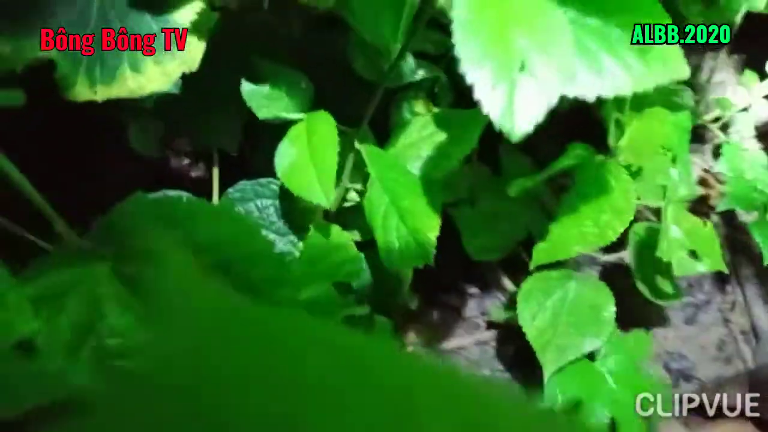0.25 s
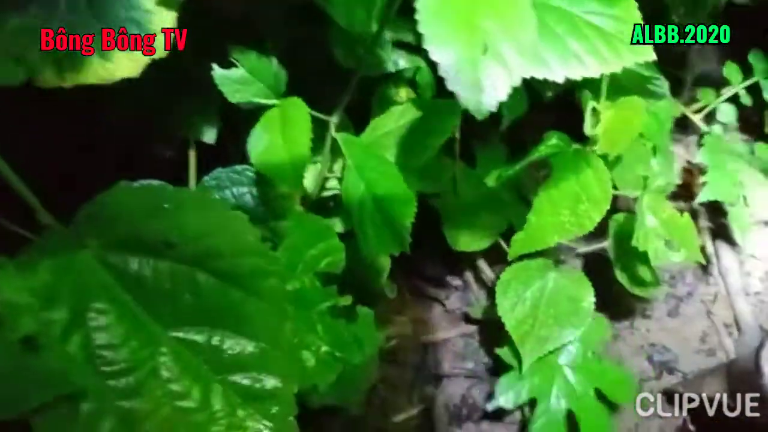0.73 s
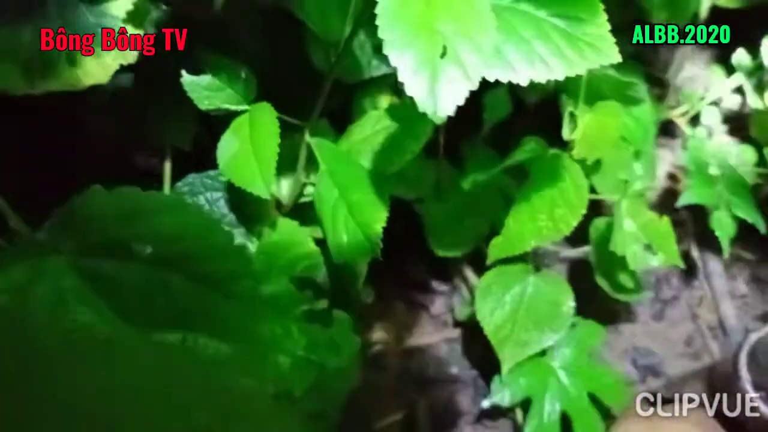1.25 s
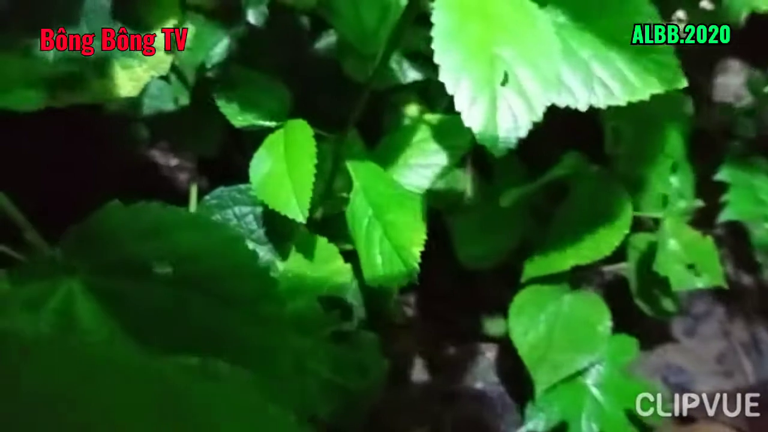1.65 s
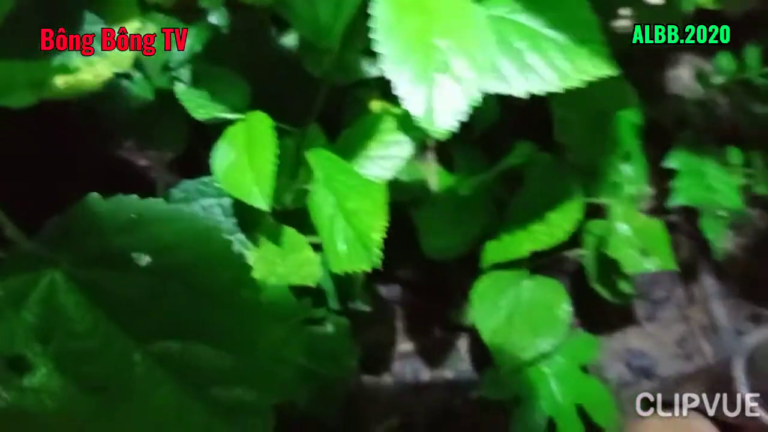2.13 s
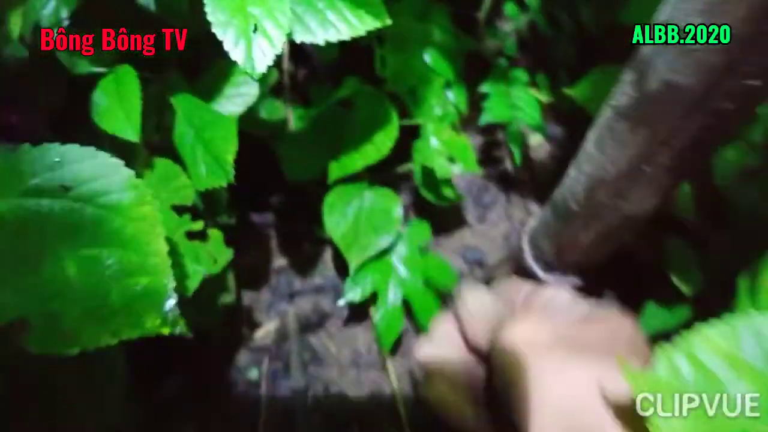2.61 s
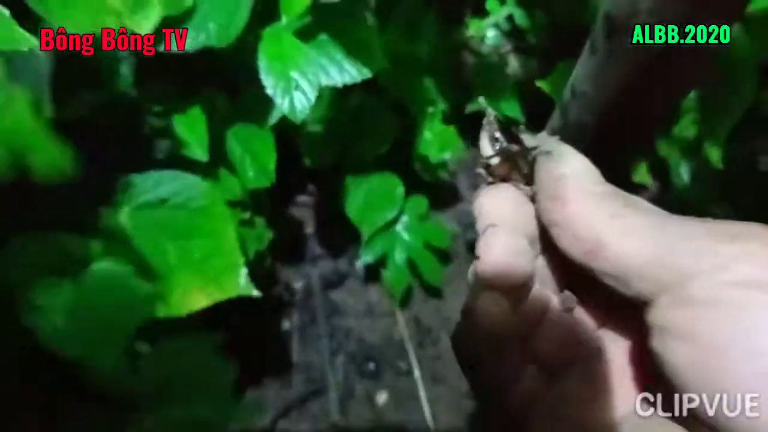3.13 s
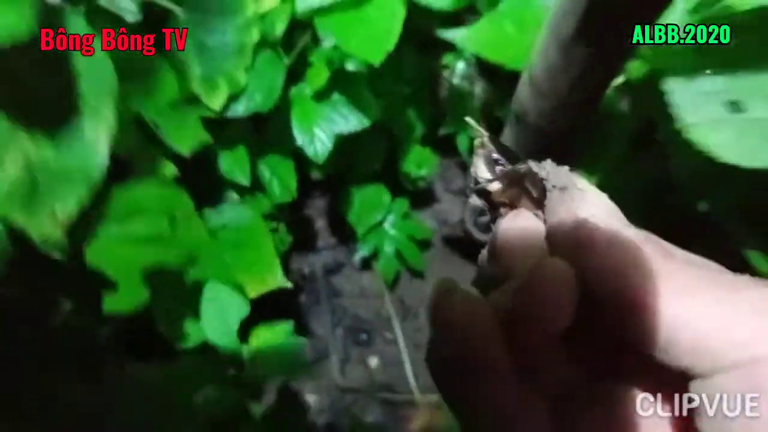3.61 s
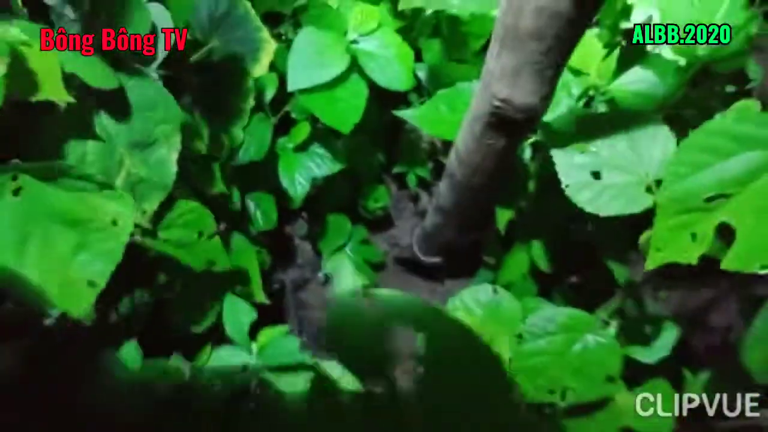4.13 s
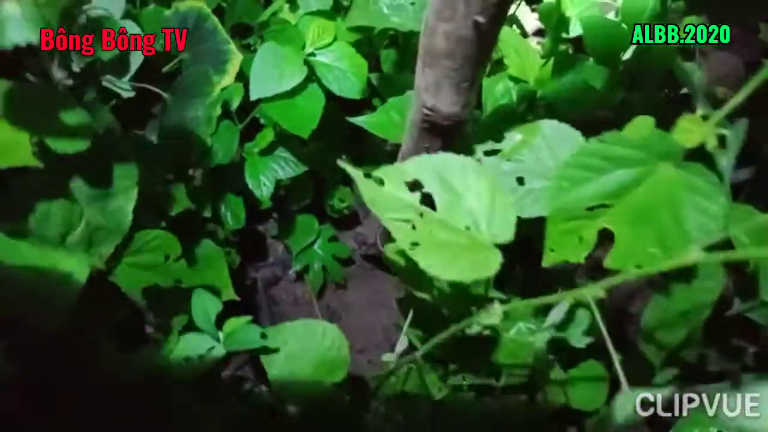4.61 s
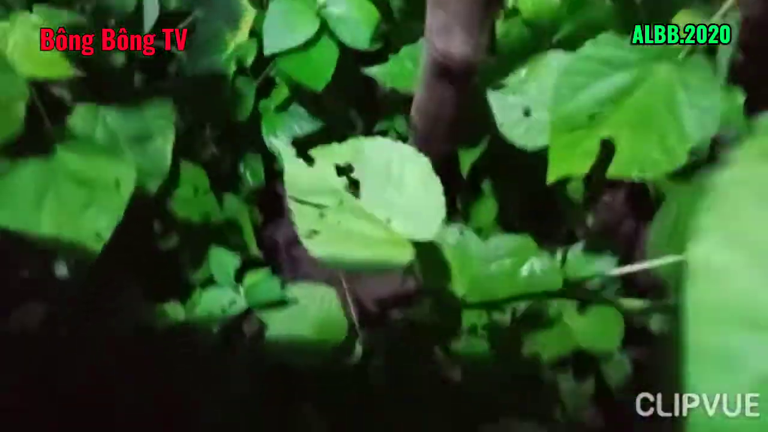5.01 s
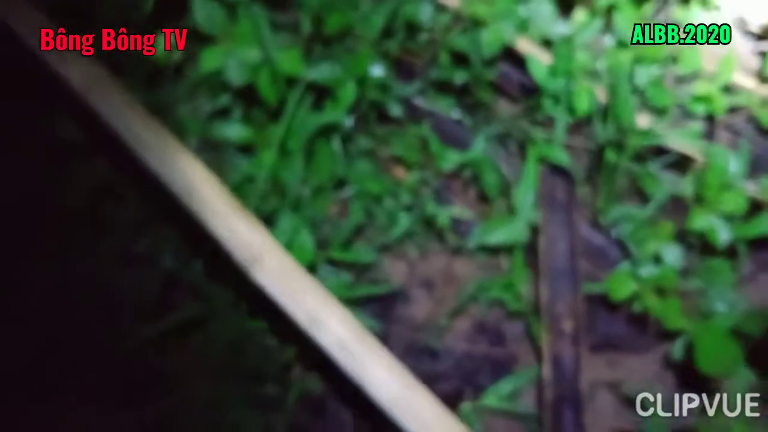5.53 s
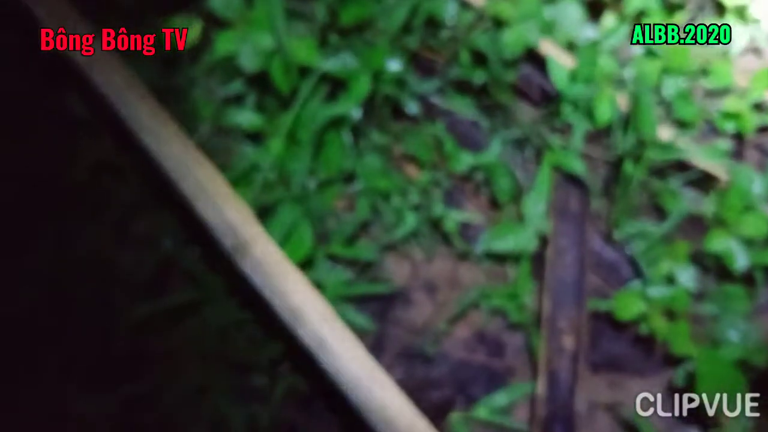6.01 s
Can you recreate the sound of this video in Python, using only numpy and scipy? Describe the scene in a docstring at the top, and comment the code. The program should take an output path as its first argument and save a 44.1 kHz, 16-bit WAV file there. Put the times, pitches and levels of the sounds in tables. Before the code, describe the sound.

A handheld microphone sits low among leaves while insects ring continuously: near crickets, a distant crowd, low chirping and very high buzzing. Light rustles and soft bumps come first, then a strong cluster of crackles, ticks and knocks in the middle. A faint motor-like drone joins late. The sound dips to silence and comes back at another spot, dominated by one piercing close cricket.

```python
"""Crickets in a night garden

Crickets trill without pause, two close by and a whole chorus behind, with other insects chirping and buzzing.
Each close cricket is a stack of tones spaced by its wing-stroke rate; far ones are strokes smeared by leaves.
A hand rustles in the leaves (clumps of snaps and noise) and bumps the microphone (short thuds and ticks).
A faint drone and hum, built from sine tones, join over low night air made of filtered noise.
The sound fades out and comes back at a second spot, right beside one loud cricket."""
import sys
import numpy as np
from scipy import signal
from scipy.fft import rfft, irfft, next_fast_len
from scipy.io import wavfile

SR = 44100
rng = np.random.default_rng(int(sys.argv[2]) if len(sys.argv) > 2 else 0)


def log_audio(samples):
    """Write samples as a 16-bit WAV file to the path given in sys.argv[1]."""
    # one column per channel
    frames = np.atleast_2d(samples).T
    # limit to full scale, then quantise
    limited = np.clip(frames, -1, 1)
    pcm = np.round(limited * 32767).astype(np.int16)
    wavfile.write(sys.argv[1], SR, pcm)


N = 276066
T = np.arange(N) / SR   # time of every sample [s]

# Tones of the nearest cricket: (multiple of stroke rate, level before the step [dB], level after it [dB])
NEAR_TONES = [(49, -62, -62), (50, -59, -56), (51, -49, -58), (52, -52, -56), (53, -56, -50),
              (54, -47, -47), (55, -43, -48), (56, -54, -44), (57, -53, -49), (58, -59, -55),
              (59, -70, -62), (60, -69, -59)]
# Its changing level, screened while the hand reaches in, then clear: (time [s], level [dB])
NEAR_LEVEL_CURVE = [(0, 1), (0.45, -0.5), (1.25, -1.5), (1.45, 1), (2.4, -0.5), (2.65, -3.5), (2.95, -2),
                    (3.55, 2.5), (3.9, 0.5), (4.8, -0.5)]
# Tones of the neighbour before its level curve: (multiple of stroke rate, level [dB])
NEIGHBOUR_TONES = [(53, -55), (54, -52), (55, -51), (56, -46), (57, -51), (58, -57), (59, -59), (60, -61),
                   (61, -65)]
# The neighbour strikes up loudly, settles, and comes close with the step: (time [s], level [dB])
NEIGHBOUR_LEVEL_CURVE = [(1.3, -27), (1.36, 2), (1.55, -5), (1.9, -2), (2.95, -1), (3.06, 4.5), (3.6, -3.5),
                         (4.8, 4)]
# Tones of the loud cricket at the second spot, before its gain: (multiple of stroke rate, level [dB])
LOUD_TONES = [(50, -52), (51, -75), (52, -44), (53, -38), (54, -38), (55, -34), (56, -35), (57, -42),
              (58, -50), (59, -54), (60, -56), (61, -59), (62, -65)]
# Tones of its higher rival, before its gain: (multiple of stroke rate, level [dB])
RIVAL_TONES = [(58, -51), (59, -46), (60, -48), (61, -64), (62, -64)]
# Tones of the rasping singer there, before its level curve: (multiple of stroke rate, level [dB])
RASPER_TONES = [(46, -67), (47, -62), (48, -61), (49, -56), (50, -63), (51, -69), (52, -68), (53, -70),
                (54, -70)]
# The rasping singer grows louder: (time [s], level [dB])
RASPER_LEVEL_CURVE = [(5.5, -3.5), (5.92, -4.5), (6.1, 1), (6.22, 4)]
# Tone colour of the crickets that join in there: (frequency [Hz], relative level [dB])
JOINING_COLOUR = [(2500, -75), (3500, -39), (3850, -6), (4030, 0.5), (4190, 8.5), (4300, 5.5), (4450, -2),
                  (4800, -43), (6000, -70)]
# Tone colour of all far insects there: (frequency [Hz], relative level [dB])
SECOND_CHORUS_COLOUR = [(1500, -69.5), (2600, -53), (2900, -35.5), (3400, -31), (3800, -10.5), (4050, -5.5),
                        (4230, -3), (4450, -4.5), (4900, -26), (5600, -24), (6400, -30.5), (7300, -31.5),
                        (8500, -23), (9700, -44), (15000, -49)]
# Chirps of the low triller: (start [s], length [s], level [dB])
LOW_CHIRP_TIMES = [(0.04, 0.2, -58), (0.29, 0.19, -54), (0.735, 0.23, -54.5), (1.097, 0.35, -57.5),
                   (1.44, 0.25, -59), (1.784, 0.33, -53), (2.123, .28, -51.5), (2.484, 0.18, -52),
                   (2.752, 0.2, -51.5), (3.742, 0.19, -53.5), (4.005, 0.34, -52), (4.605, 0.61, -55)]
# Phrases of the shrill triller: (start [s], level [dB])
SHRILL_PHRASE_TIMES = [(0.58, -50.5), (2.479, -50.5), (4.47, -55)]
# Bouts of the bush-cricket's buzz: (start [s], length [s], level [dB])
BUZZ_TIMES = [(-0.6, .91, -53), (1.336, 1.9, -53), (4.678, 1.0, -56)]
# A hand brushes leaves and soil: (start [s], length [s], level [dB])
BRUSH_STROKES = [(0.098, 0.039, -54.5), (0.167, 1, -61.5), (0.453, 0.038, -55), (0.757, 0.13, -57),
                 (1.124, 0.089, -55), (2.47, 1, -60), (2.693, 0.15, -61.5), (2.861, 0.082, -47),
                 (2.952, 0.13, -51.5), (3.037, 0.31, -45), (3.183, 0.11, -55), (3.68, 0.72, -58.5)]
# Tone colour of the rustle: (frequency [Hz], relative level [dB])
LEAF_COLOUR = [(25, -39), (50, -23), (110, 0), (200, -3), (350, -8), (700, -8.5), (1600, -10.5), (3300, -4),
               (6000, -9), (12000, -19.5), (16000, -35)]
# Soft bumps on the microphone: (time [s], thud level before decay [dB], thud pitch [Hz], knock re thud [dB])
MICROPHONE_BUMPS = [(0.107, -46.5, 340, -20), (0.46, -54, 323, -6), (0.623, -48, 110, -24),
                    (3.051, -33.5, 230, -13), (3.076, -31, 149, -9), (3.113, -37, 111, -23),
                    (3.758, -41, 197, -21), (4.507, -47.5, 347, 0.5), (5.002, -35, 120, 0.5)]
# Ticks of twigs and leaf stalks, before decay: (time [s], bright snap level [dB], woody body level [dB])
TWIG_TICKS = [(0.597, -45, -70), (0.839, -60, -54.5), (0.893, -56, -43.5), (1.135, -52, -59),
              (1.267, -56, -46.5), (1.304, -46, -61), (2.642, -50, -68), (2.728, -50, -42.5),
              (2.975, -38, -55), (3.052, -35, -37.5), (3.081, -32, -52), (3.155, -44, -56),
              (3.212, -48, -51), (3.701, -31.5, -46)]
# Tone colour of the bright snaps: (frequency [Hz], relative level [dB])
SNAP_COLOUR = [(300, -21), (1200, -23), (4000, 4), (9000, -7), (14000, -11), (16000, -11)]
# Far chorus at the first spot: (time [s], cricket level [dB], higher rasper level [dB])
CHORUS_LEVELS = [(0, -44, -42.5), (0.5, -42.5, -45.5), (1.31, -43.5, -45), (1.4, -43.5, -43.5),
                 (2.7, -43, -43.3), (3.4, -41.5, -42.5), (4.8, -43.5, -41)]
# Tone colour of the far crickets: (frequency [Hz], relative level [dB])
FAR_CRICKET_COLOUR = [(2700, -40), (3000, -16), (3350, -12), (3560, -15), (3800, -12), (4000, -4),
                      (4200, 0), (4380, -4), (4600, -12), (4900, -28), (5500, -60)]
# Tone colour of the far raspers: (frequency [Hz], relative level [dB])
FAR_RASPER_COLOUR = [(4200, -50), (4700, -10), (5050, 0.5), (5500, 3), (5900, 0), (6400, -9.5), (7000, -11),
                     (8300, -10), (9200, -25), (11000, -29.5), (15500, -48)]
# Tones inside the far drone: (multiple of its base pitch, relative level [dB])
DRONE_TONES = [(2, -10), (3, -14), (4, 2), (5, -21), (6, -6.5), (7, -5.5), (8, -3), (9, -10), (10, -11),
               (11, -6.5), (12, -7), (13, -23)]
# Tone colour of the night air: (frequency [Hz], relative level [dB])
NIGHT_AIR_COLOUR = [(20, -36), (45, -10), (105, 2.5), (160, -0.5), (300, -6.5), (560, -6.5), (750, -26),
                    (1300, -21), (2400, -8.5), (3500, -19), (9000, -39), (16000, -50)]

# Average wing strokes per second; the nearest cricket changes rate during the step
NEAR_RATE_BEFORE, NEAR_RATE_AFTER, NEIGHBOUR_RATE = 72.73, 72.9, 74.68
LOUD_RATE, RIVAL_RATE, RASPER_RATE = 76.18, 75.74, 115.0
LOW_RATE, SHRILL_RATE, BUZZ_RATE = 57.8, 59.2, 113.7
STEP_FROM_S, STEP_TO_S = 2.35, 3.25   # the step sideways
JOIN_FROM_S, JOIN_TO_S = 4.96, 5.92   # more crickets join in at the second spot
FADE_OUT_S, SILENT_FROM_S, SILENT_TO_S, FADE_IN_S = 4.75, 5.245, 5.253, 5.65   # FADE_IN_S: fade-in is done

CHIRP_EDGE_S = 0.063   # each low chirp swells and dies in this time
LOW_REST_DB, LOW_WAVER_DB = -56.5, 1.4   # soft trilling that never stops; typical wavering of strength
PHRASE_S, PHRASE_ATTACK_S, PHRASE_RELEASE_S = 1.3, 0.14, 0.25
# Shrill phrases and buzzes start flat and creep up to their pitch
SHRILL_TOP_HZ, SHRILL_FLAT_HZ, WARM_UP_S = 7524, 479, 0.42
BUZZ_HZ, BUZZ_FLAT_HZ = 10030, 449
BUZZ_ATTACK_S, BUZZ_RELEASE_S = 0.35, 0.046
BUZZ_HISS_DB, BUZZ_HISS_HZ = -6.5, 10450   # a broad hiss around the buzz
BUZZ_TOP_HZ, BUZZ_TOP_DB = 14850, -11   # a thin upper ring that grows as the bout warms up

BRUSH_ATTACK_SHARE, BRUSH_RELEASE_SHARE = 0.028, 0.7   # shares of each brush's length
STIR_DB = -76.5   # leaves keep stirring between the brushes
SNAPS_PER_S, CLUMP_DB = 2200, 1.7
# A leaf quivers against the microphone in an even run of soft thumps
QUIVER_START_S, QUIVER_GAP_S, QUIVER_COUNT = 0.029, 0.0545, 7
QUIVER_DB, QUIVER_HZ, QUIVER_KNOCK_DB = -47.5, 123, -24

DRONE_START_S, DRONE_ATTACK_S, DRONE_DB = 4.33, 0.029, -64
DRONE_START_HZ, DRONE_SAG_HZ_PER_S = 150, 21
HUM_START_S, HUM_ATTACK_S, HUM_HZ, HUM_DB = 3.16, 0.5, 180, -66
HUM_OCTAVE_DB = -7.5   # relative to the hum
FIRST_AIR_DB, SECOND_AIR_DB = -62.5, -70
CUTOFF_HZ = 15700


def near_crickets():
    """Two close crickets; a step changes the paths through the leaves, and so the strength of each tone."""
    step = ramp(STEP_FROM_S, STEP_TO_S)
    near_db, = in_time(NEAR_LEVEL_CURVE)
    neighbour_db, = in_time(NEIGHBOUR_LEVEL_CURVE)
    lines = [(k, before + (after - before) * step) for k, before, after in NEAR_TONES]
    rate = NEAR_RATE_BEFORE + (NEAR_RATE_AFTER - NEAR_RATE_BEFORE) * step
    nearest = trill(lines, rate, glide_s=.0165, jitter=.0003, flutter_db=.6, fading_db=.8, echo_s=.0035)
    neighbour = trill(NEIGHBOUR_TONES, NEIGHBOUR_RATE, glide_s=.022, jitter=.0006,
                      flutter_db=1.2, fading_db=1.8, echo_s=.0043)
    song = from_db(near_db) * nearest + from_db(neighbour_db) * neighbour
    return song.real + from_db(-57) * overtone(song, order=2)


def second_spot():
    """A loud cricket with overtones, a rival, a swelling rasper, others joining in and a far chorus."""
    loud = from_db(.3) * trill(LOUD_TONES, LOUD_RATE, glide_s=.009, jitter=.0003,
                               flutter_db=.35, fading_db=.3)
    rival = from_db(-4) * trill(RIVAL_TONES, RIVAL_RATE, glide_s=.012, jitter=.0008,
                                flutter_db=1.5, fading_db=2.0)
    second_overtone = from_db(-43) * overtone(loud, order=2)
    third_overtone = from_db(-63.5) * resonant(overtone(loud + rival, order=3), 12900, 800)

    rasper_db, = in_time(RASPER_LEVEL_CURVE)
    rasper = trill(RASPER_TONES, RASPER_RATE, glide_s=.001, jitter=.0008, flutter_db=.8, fading_db=1.0)
    rasper = from_db(rasper_db) * rasper.real

    joiners = coloured(crowd(76, .05, jitter_s=.00003, smear_s=.008, count=3), JOINING_COLOUR)
    joiners = from_db(-35.3) * ramp(JOIN_FROM_S, JOIN_TO_S) * joiners
    far = coloured(crowd(75, .04, jitter_s=.00004, smear_s=.009, count=8), SECOND_CHORUS_COLOUR)
    return (loud + rival).real + second_overtone + third_overtone + rasper + joiners + from_db(-39.5) * far


def low_triller():
    """Low chirps over soft trilling: falling pips and noisier scrapes, both at about the stroke rate."""
    level = from_db(LOW_REST_DB)
    for start, length, db in LOW_CHIRP_TIMES:
        level = level + from_db(db) * swell(start, length, CHIRP_EDGE_S, CHIRP_EDGE_S)
    voice = .6 * pips(LOW_RATE, 2930, fall_hz=220) + .55 * rasp(LOW_RATE, 2920, 150, duty=.7)
    return level * from_db(LOW_WAVER_DB * drift(9)) * voice


def shrill_triller():
    """Phrases creep up in pitch: a pure falling pip and a lower, noisier scrape, both at about the stroke rate."""
    level = sum(from_db(db) * swell(start, PHRASE_S, PHRASE_ATTACK_S, PHRASE_RELEASE_S)
                for start, db in SHRILL_PHRASE_TIMES)
    hz = SHRILL_TOP_HZ - SHRILL_FLAT_HZ * coldness([start for start, db in SHRILL_PHRASE_TIMES])
    pip = pips(SHRILL_RATE, hz + 50, fall_hz=450)
    scrape = rasp(SHRILL_RATE, hz - 140, 300, duty=1.2)
    return level * (.7 * pip + .62 * scrape)


def bush_cricket():
    """Long buzzes: scraping strokes excite a main ring, a broad hiss and a thin upper ring."""
    level = sum(from_db(db) * swell(start, length, BUZZ_ATTACK_S, BUZZ_RELEASE_S)
                for start, length, db in BUZZ_TIMES)
    cold = coldness([start for start, length, db in BUZZ_TIMES])
    buzz = rasp(BUZZ_RATE, BUZZ_HZ - BUZZ_FLAT_HZ * cold, 620, duty=1.1)
    hiss = from_db(BUZZ_HISS_DB) * rasp(BUZZ_RATE, BUZZ_HISS_HZ, 2600, duty=.8)
    warmth = np.clip(1 - cold, 0, 1) ** 2
    top_level = warmth * from_db(BUZZ_TOP_DB + 2.6 * drift(8.7))
    top = top_level * rasp(BUZZ_RATE, BUZZ_TOP_HZ, 500, duty=1.3)
    return level * (buzz + hiss + top)


def rustle():
    """Leaves and crumbs of soil: tiny uneven snaps over a soft brushing, coming in clumps."""
    level = from_db(STIR_DB + 1.8 * drift(4.4))
    for start, length, db in BRUSH_STROKES:
        level = level + from_db(db) * swell(start, length, BRUSH_ATTACK_SHARE * length,
                                            BRUSH_RELEASE_SHARE * length)
    happens = rng.random(N) < SNAPS_PER_S / SR
    snaps = happens * rng.choice([-1, 1], N) * from_db(rng.uniform(-14, 0, N))
    brushing = .5 * rng.standard_normal(N)
    clumps = from_db(CLUMP_DB * np.clip(drift(60), -2, 1.5))
    return level * clumps * coloured(rms_one(snaps) + brushing, LEAF_COLOUR)


def bumps():
    """Each soft bump, and each thump of the quivering leaf, is a dying sine thud with a dull knock."""
    out = np.zeros(N)
    knock = noise_band(120, 1200)
    quiver = [(QUIVER_START_S + k * QUIVER_GAP_S, QUIVER_DB, QUIVER_HZ, QUIVER_KNOCK_DB)
              for k in range(QUIVER_COUNT)]
    age = T[:SR // 8]
    for start, db, hz, knock_db in [*MICROPHONE_BUMPS, *quiver]:
        span = slice(int(start * SR), int(start * SR) + len(age))
        thud = np.sin(2 * np.pi * hz * age) * np.exp(-age / .009)
        out[span] += from_db(db) * (thud + from_db(knock_db) * knock[span] * np.exp(-age / .004))
    return out


def twig_ticks():
    """Twigs and leaf stalks give short dying bursts of noise: a bright snap over a woody body."""
    out = np.zeros(N)
    snap = coloured(rng.standard_normal(N), SNAP_COLOUR)
    wood = noise_band(700, 3500)
    age = T[:SR // 25]
    for start, snap_db, body_db in TWIG_TICKS:
        span = slice(int(start * SR), int(start * SR) + len(age))
        tick = from_db(snap_db) * snap[span] + from_db(body_db) * wood[span]
        out[span] += tick * np.exp(-age / .003)
    return out


def chorus():
    """Far crickets round 4 kHz and a higher, raspier crowd."""
    cricket_db, rasper_db = in_time(CHORUS_LEVELS)
    crickets = coloured(crowd(74, .04, jitter_s=.00002, smear_s=.013, count=7), FAR_CRICKET_COLOUR)
    raspers = coloured(crowd(114, .025, jitter_s=.000035, smear_s=.014, count=9), FAR_RASPER_COLOUR)
    return from_db(cricket_db) * crickets + from_db(rasper_db) * raspers


def far_drone():
    """A faint rough stack of tones that sinks in pitch, like a distant motor."""
    hz = DRONE_START_HZ - DRONE_SAG_HZ_PER_S * (T - DRONE_START_S)
    turns = np.cumsum(hz * (1 + .02 * drift(10))) / SR
    drone = 0
    for multiple, db in DRONE_TONES:
        strength = from_db(db + 5 * np.clip(drift(14), -2, 1))
        drone = drone + strength * np.sin(2 * np.pi * round(multiple) * turns + 1.1 * drift(20))
    return from_db(DRONE_DB) * ramp(DRONE_START_S, DRONE_START_S + DRONE_ATTACK_S) * drone


def low_hum():
    """A hum and its octave, with a wandering phase, that begin before the drone and stay."""
    phase = 2 * np.pi * HUM_HZ * T + .83 * drift(5.1)
    hum = np.sin(phase) + from_db(HUM_OCTAVE_DB) * np.sin(2 * phase)
    return from_db(HUM_DB) * ramp(HUM_START_S, HUM_START_S + HUM_ATTACK_S) * hum


def night_air():
    """Steady night air: noise filtered to its own tone colour; rms 1."""
    return coloured(rng.standard_normal(N), NIGHT_AIR_COLOUR)


def trill(lines, rate, glide_s, jitter, flutter_db, fading_db, echo_s=0):
    """One cricket as a complex tone: repeating the same short falling whistle gives tones at multiples of rate.

    Higher tones arrive earlier, by glide_s per kHz; a ground bounce echo_s later shifts their phases."""
    strokes = np.cumsum(rate * np.ones(N)) / SR + rng.random() + jitter * drift(35)
    mean_rate, song = np.mean(rate), 0
    for multiple, db in lines:
        k = round(multiple)
        sweep = glide_s / 1000 * (k * mean_rate) ** 2 / 2
        bounce = np.angle(1 + .9 * np.exp(-2j * np.pi * k * mean_rate * echo_s))
        # shifting echoes from the leaves change the strength and the phase of each tone
        paths = np.log(from_db(fading_db)) * (drift(1.0) + 2j * drift(.8))
        turns = (k * strokes + sweep) % 1
        song = song + from_db(db) * np.exp(paths + 1j * bounce + 2j * np.pi * turns)
    return np.sqrt(2) * song * from_db(flutter_db * drift(17))


def overtone(song, order):
    """The wing rings not quite linearly: a harmonic that follows each stroke."""
    return (song ** order / (np.abs(song) + 1e-9) ** (order - 1)).real


def pips(rate, hz, fall_hz):
    """A pure voice: each wing stroke is a rounded pip of its own strength that falls in pitch; rms 1."""
    strokes = np.cumsum(rate * (1 + .008 * drift(2))) / SR
    within = strokes % 1   # progress through the current stroke
    random_pairs = rng.random((int(strokes[-1]) + 1, 2))
    start, strength = random_pairs[strokes.astype(int)].T
    turns = np.cumsum(hz - fall_hz * (within - .5)) / SR + start
    return rms_one((1 + strength) * np.sin(np.pi * within) ** 2 * np.sin(2 * np.pi * turns))


def rasp(rate, hz, width_hz, duty):
    """Each wing stroke is a scrape, dying over duty strokes, that rings a resonance; rms about 1."""
    strokes = np.cumsum(rate * (1 + .012 * drift(2.8))) / SR
    scraping = np.exp(-(strokes % 1) / duty)
    tone = resonant(scraping * rng.standard_normal(N), np.mean(hz), width_hz)
    # shift the ringing so that it follows a changing pitch
    bend = np.exp(2j * np.pi * np.cumsum((hz - np.mean(hz)) * np.ones(N)) / SR)
    return (signal.hilbert(tone, next_fast_len(N))[:N] * bend).real


def crowd(rate, spread, jitter_s, smear_s, count):
    """Far singers, each with its own rate, swell and ebb; foliage smears each stroke into echoes."""
    out, age = np.zeros(N), np.arange(SR // 25) / SR
    for singer in range(count):
        period = 1 / (rate * (1 + spread * rng.uniform(-1, 1)))
        starts = (np.arange(1000) + rng.random()) * period + jitter_s * rng.standard_normal(1000)
        starts = starts[(starts > 0) & (starts < T[-1])]
        strokes = np.bincount((starts * SR).astype(int), minlength=N)
        echoes = rng.standard_normal(len(age)) * np.exp(-age / smear_s)
        out += signal.oaconvolve(strokes, echoes)[:N] * from_db(2 * drift(1.0))
    return out


def coldness(starts):
    """Jumps up by 1 at each start and dies away as the singer warms up."""
    return sum((T >= start) * np.exp(-np.abs(T - start) / WARM_UP_S) for start in starts)


def from_db(db):
    """Turns decibels into a plain multiplier."""
    return np.exp(np.asarray(db) * (np.log(10) / 20))


def rms_one(x):
    """Scales a sound to an average strength (rms) of 1."""
    return x / np.sqrt(np.mean(x ** 2) + 1e-20)


def in_time(rows):
    """Each column of a curve, read at every sample."""
    seconds, *columns = np.transpose(rows)
    return [np.interp(T, seconds, column) for column in columns]


def ramp(start, end):
    """Rises from 0 to 1 between two times."""
    return np.clip((T - start) / (end - start), 0, 1)


def swell(start, length, attack, release):
    """Attack, hold and release of one sound, from 0 to 1 and back."""
    return ramp(start, start + attack) * (1 - ramp(start + length - release, start + length))


def drift(rate):
    """Slow random wandering of rms 1: coarse noise smoothed twice, with its corner at rate Hz."""
    r = np.exp(-80 * np.pi * rate / SR)   # one coarse step is 40 samples
    noise = rng.standard_normal(N // 40 + 2002)
    slow = signal.lfilter([1], [1, -2 * r, r * r], noise)[2000:]   # skip the filter's start
    return np.interp(np.arange(N) / 40, np.arange(len(slow)), rms_one(slow))


def coloured(x, colour):
    """Filters x with a curve of (frequency [Hz], relative level [dB]) points; rms 1."""
    size = next_fast_len(N + SR // 10)
    hz, db = np.transpose(sorted(map(tuple, colour)))
    log_hz = np.log(np.fft.rfftfreq(size, 1 / SR) + 1)
    gain = from_db(np.interp(log_hz, np.log(hz), db))
    return rms_one(irfft(rfft(x, size) * gain, size)[:N])


def noise_band(low_hz, high_hz):
    """Noise kept between two frequencies; rms 1."""
    band = signal.butter(2, [low_hz, high_hz], "band", fs=SR, output="sos")
    return rms_one(signal.sosfilt(band, rng.standard_normal(N)))


def resonant(x, hz, width_hz):
    """Passes x twice through one resonance; rms 1."""
    r = np.exp(-np.pi * width_hz / SR)
    b, a = [1, 0.003, -1.13], [1, -2 * r * np.cos(2 * np.pi * hz / SR), r * r]
    return rms_one(signal.lfilter(b, a, signal.lfilter(b, a, x)))


def scene():
    """The first spot fades out, then the second fades in."""
    air = night_air()
    insects = near_crickets() + low_triller() + shrill_triller() + bush_cricket() + chorus()
    hand = rustle() + bumps() + twig_ticks()
    first = insects + hand + far_drone() + low_hum() + from_db(FIRST_AIR_DB) * air
    second = second_spot() + from_db(SECOND_AIR_DB) * air
    fade_out = 1 - ramp(FADE_OUT_S, SILENT_FROM_S)
    fade_in = ramp(SILENT_TO_S, FADE_IN_S)
    return (first * fade_out + second * fade_in)[None]


def record(dry):
    """A slightly lopsided microphone turns loud strokes into a faint purr; deep bass and top are cut."""
    purr = signal.sosfilt(signal.butter(2, [60, 500], "band", fs=SR, output="sos"), dry ** 2)
    thin = signal.sosfilt(signal.butter(2, 48, "high", fs=SR, output="sos"), dry + 0.28 * purr)
    return signal.sosfilt(signal.ellip(12, .1, 90, CUTOFF_HZ, fs=SR, output="sos"), thin)


dry = scene()
out = record(dry)
log_audio(out)
```